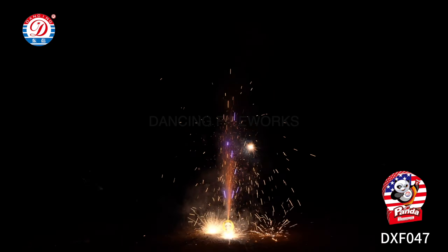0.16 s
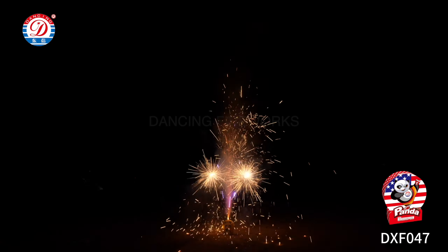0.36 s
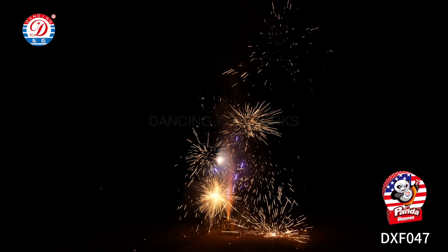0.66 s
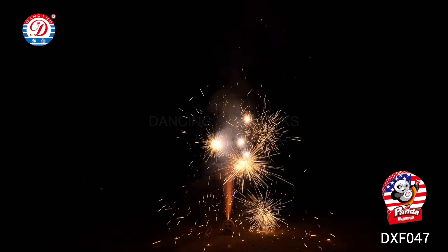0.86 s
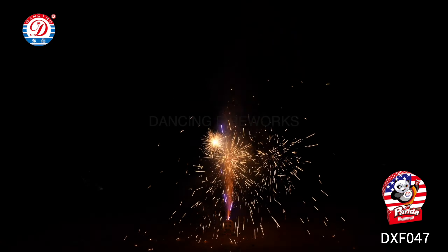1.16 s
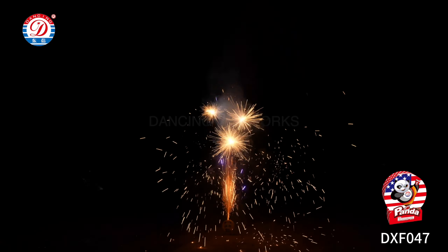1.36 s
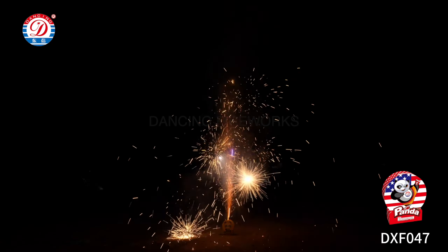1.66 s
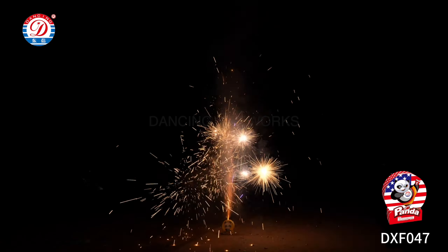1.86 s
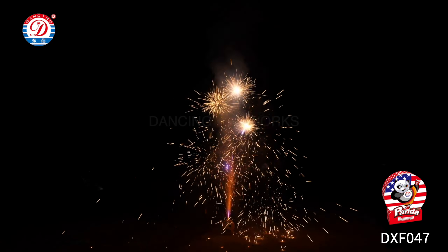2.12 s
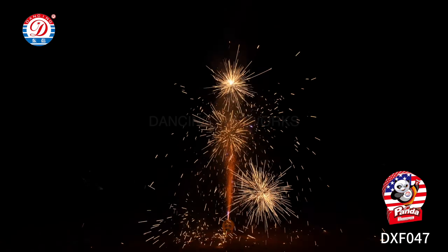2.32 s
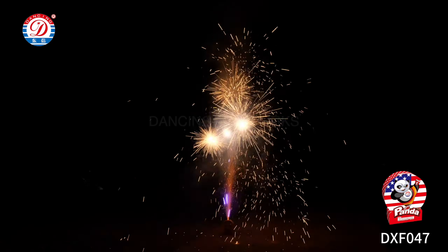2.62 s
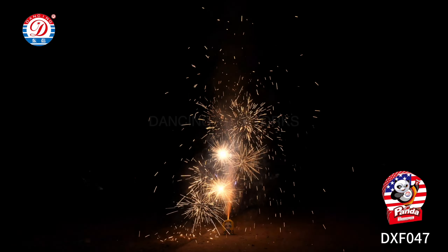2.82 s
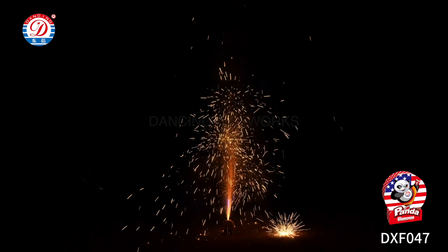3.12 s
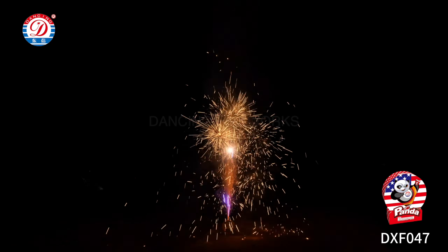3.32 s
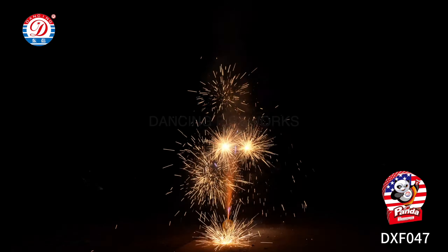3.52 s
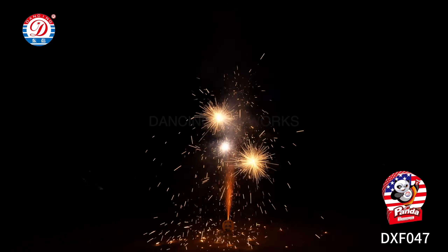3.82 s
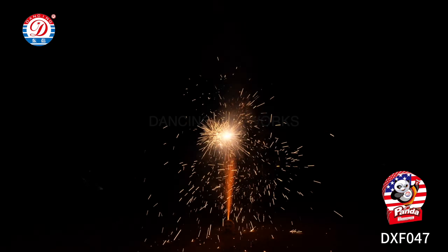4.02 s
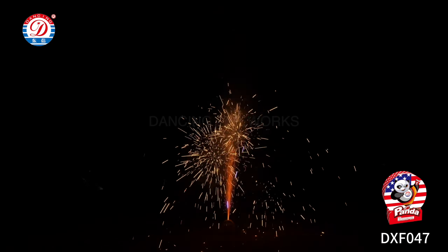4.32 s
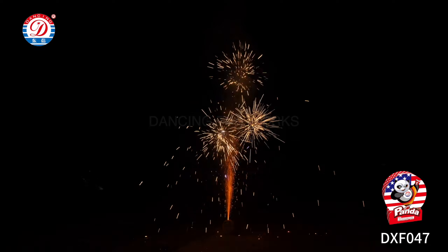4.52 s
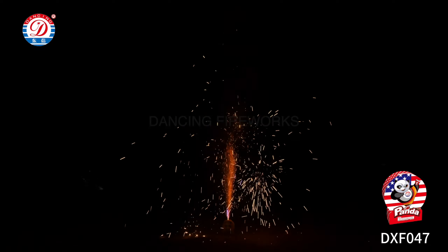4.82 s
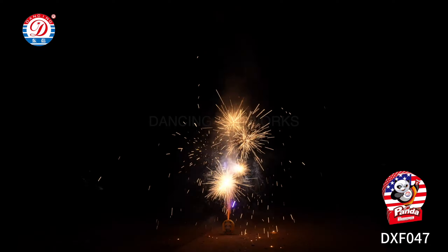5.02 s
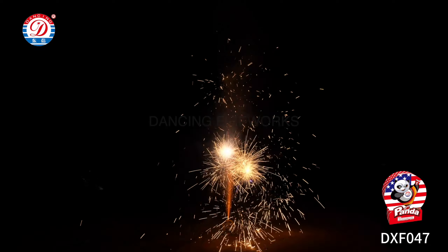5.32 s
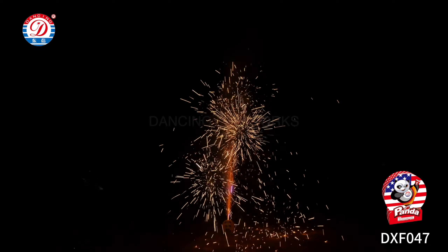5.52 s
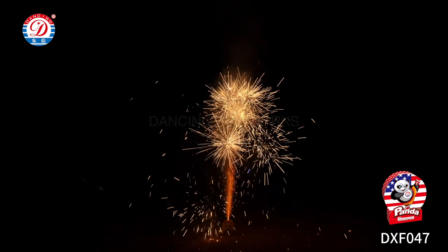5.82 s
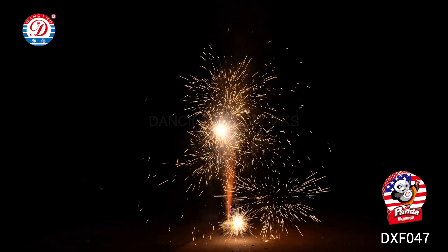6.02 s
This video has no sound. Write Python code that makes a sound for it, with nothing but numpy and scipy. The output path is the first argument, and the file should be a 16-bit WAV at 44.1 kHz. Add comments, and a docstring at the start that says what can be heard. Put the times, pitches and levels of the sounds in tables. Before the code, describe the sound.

Rapid dry crackling pops and short fizzes burst over a steady jet hiss, with a few much louder cracks, close in open air.

```python
"""Outdoors at night, a ground firework fountain burns: its nozzle hisses close above the pavement.
The stars it throws burst about thirty times a second, each a noise snap and a short gritty fizz.
About half of them shed a crumb that bursts faintly just after; all leave a brief sizzle of fine sparks.
Scatter trails the crackle. A limiter ducks everything after loud bursts; the hiss swells back in the lulls."""
import sys
import numpy as np
from scipy import signal
from scipy.fft import rfft, irfft, next_fast_len
from scipy.io import wavfile
from scipy.ndimage import uniform_filter1d, map_coordinates

SR = 44100
rng = np.random.default_rng(int(sys.argv[2]) if len(sys.argv) > 2 else 0)


def generate_wav(signal):
    """Clip the signal to [-1, 1] and save it as 16-bit WAV at the path in sys.argv[1]."""
    frames = np.transpose(np.atleast_2d(signal))
    scaled = np.clip(frames, -1, 1) * 32767
    pcm = np.round(scaled).astype(np.int16)
    wavfile.write(sys.argv[1], SR, pcm)


N = 272097
TOP_HZ = 15900  # upper band limit


def amp(db):
    """Decibels to gain."""
    return 10 ** (np.asarray(db) / 20)


def unit(x):
    """Scale to rms 1."""
    return x / np.sqrt(np.mean(x ** 2) + 1e-20)


def along(points, hz):
    """Interpolate (Hz, value) points on a log frequency axis."""
    point_hz, value = np.transpose(points)
    return np.interp(np.log(hz + 1), np.log(point_hz + 1), value)


def wobble(knots_per_s):
    """Smooth random curve: a spline through Gaussian knots."""
    knots = rng.standard_normal(int(N * knots_per_s / SR) + 4)
    return map_coordinates(knots, [np.arange(N) * knots_per_s / SR])


def filtered(x, response):
    """Filter x with a complex response of frequency."""
    size = next_fast_len(N + SR // 2)
    hz = np.fft.rfftfreq(size, 1 / SR)
    return irfft(rfft(x, size) * response(hz), size)[..., :N]


def causal(gain):
    """Minimum-phase response with this gain along the last axis, by folding the cepstrum."""
    cepstrum = irfft(np.log(gain))
    index = np.arange(cepstrum.shape[-1])
    fold = (1 + np.sign(index)) * (index < len(index) / 2)
    return np.exp(rfft(cepstrum * fold))


def echo(hz, delay_ms, strength):
    """Response of a sound plus one reflection, scaled to unchanged mean power."""
    reflection = strength * np.exp(-2j * np.pi * hz * delay_ms / 1000)
    return (1 + reflection) / np.sqrt(1 + strength ** 2)


# Spectrum of the gas jet. Each row: frequency in Hz, relative density in dB per Hz.
JET_SPECTRUM = [(20, -27), (130, -8), (300, -7.5), (560, -7), (1200, -1.5), (2100, -6), (3450, 1),
                (4500, -5), (7200, -6), (9000, -8.5), (16000, -42)]


def nozzle():
    """Turbulent gas jet: shaped noise, slightly hollow, combed by the ground just below, sputtering."""
    ground_ms = np.array([[.28], [.305]])  # left, right microphone

    def response(hz):
        hollow = echo(hz, delay_ms=2.83, strength=-along([(1500, .28), (3000, .06)], hz))
        comb = echo(hz, ground_ms, strength=.55)
        return amp(along(JET_SPECTRUM, hz)) * comb * hollow * (hz < TOP_HZ)

    hiss = unit(filtered(rng.standard_normal(N), response))
    sputter_db = 1.0 * wobble(25) + 2 * wobble(220)
    return amp(sputter_db) * hiss


# Spectrum of the hiss arriving from all around. Each row: frequency in Hz, relative density in dB per Hz.
SURROUND_SPECTRUM = [(15, -28), (45, -9), (200, -17), (1100, -4), (2800, -14), (4100, 12), (6000, 2),
                     (8200, 13), (9400, -16), (16000, -23)]


def surround():
    """Jet hiss scattered by smoke and ground: noise independent at the two microphones."""
    noise = rng.standard_normal((2, N))
    return unit(filtered(noise, lambda hz: amp(along(SURROUND_SPECTRUM, hz))))


# Level of the jet hiss over time, stronger in some lulls. Each row: time in seconds, relative level in dB.
HISS_LEVEL = [(0.0, -30), (0.17, -24), (0.6, -26.5), (1.4, -29.5), (3.05, -29), (4.15, -31.5), (4.4, -28),
              (4.85, -28), (5.2, -28), (5.93, -24), (6.17, -29.5)]


def jet():
    """One level curve drives the direct hiss and its scattered part alike."""
    level_db = np.interp(np.arange(N) / SR, *np.transpose(HISS_LEVEL))
    return amp(level_db) * (amp(-3.6) * nozzle() + amp(-14.5) * surround())


CRUMB_COUNT = 90  # stars that shed one
CRUMB_DELAY_S, CRUMB_REL_DB, CRUMB_BURN_MS = 0.011, -25.5, 12.3  # typical crumb
CRUMB_SPREAD_LOG, CRUMB_SPREAD_DB = 0.33, 1  # scatter of delay and burn time; of level
# Bursting stars, loud and faint. Each row: start in seconds, relative level in dB, burn time in ms.
LISTED_STARS = [ (0.014, -17, 14), (0.038, -23, 3.2), (0.0562, -17.5, 6.4), (0.0816, -20, 5.7),
                (0.1344, -19, 6.7), (0.2084, -7, 23), (0.2285, -10.5, 12), (0.2694, -16.5, 2.4),
                (0.288, -19, 9.8), (0.312, -16, 10.6), (0.33, -17, 2.2), (0.3827, -15.5, 1.4),
                (0.389, -20, 11), (0.4328, -13, 3.3), (0.4736, -3, 6.5), (0.488, -10, 16.5),
                (0.518, -20, 6.4), (0.5296, -11, 2), (0.5723, 4, 15), (0.635, -9.5, 9.1), (0.648, -16, 10),
                (0.682, -12, 9), (0.712, -12, 5), (0.734, -12.5, 5.2), (0.75, -19, 23), (0.8156, -9.5, 3),
                (0.826, -18, 9.6), (0.8445, -18, 4.4), (0.8755, -16, 6.8), (0.889, -21, 26),
                (0.956, -20.5, 14), (1.0254, -17.5, 6.5), (1.12, -24, 6.3), (1.184, -18.5, 7),
                (1.218, -7, 5.3), (1.2447, -12, 2), (1.269, -6, 9.3), (1.288, -20, 4.9), (1.327, -32, 6),
                (1.399, -12.5, 7), (1.4123, -18, 12.3), (1.468, -17.5, 4), (1.483, -19, 6.4),
                (1.506, -14.5, 6.5), (1.5642, -17, 7.7), (1.5864, -22.5, 2.7), (1.621, -17.5, 3.6),
                (1.6434, -22.5, 3.8), (1.657, -22.5, 2.6), (1.686, -12, 5), (1.716, -18, 6.1),
                (1.782, -8, 7.5), (1.8044, -4, 5), (1.821, -11, 4.1), (1.833, -12.5, 7.2),
                (1.849, -21.5, 18), (1.890, -15, 6), (1.91, -25, 4), (1.923, -14, 5.6), (1.950, -9, 2.5),
                (1.972, -20.5, 9.2), (1.9888, -7.5, 3.3), (2.0265, -20, 8.3), (2.0614, -23, 7.5),
                (2.083, -19, 8.3), (2.133, -8, 8.4), (2.167, -13, 6), (2.181, -15.5, 2.7), (2.21, -25, 6.9),
                (2.234, -24, 5.7), (2.267, -11, 3.1), (2.336, -12, 4.8), (2.3456, -14.5, 4.4),
                (2.408, -21, 3.8), (2.423, -20, 3.3), (2.433, -11, 3.9), (2.451, -18.5, 4.2),
                (2.469, -18, 3.9), (2.48, -16, 4.1), (2.495, -14, 6.6), (2.522, -19, 7), (2.551, -11, 9.8),
                (2.574, -26, 6.3), (2.658, -10.5, 6.5), (2.683, -18.5, 13), (2.692, -20, 5.1),
                (2.707, -9.5, 4.3), (2.748, -24.5, 29), (2.799, -11.5, 1.2), (2.829, -14, 9.7),
                (2.872, -13.5, 4.8), (2.890, -12, 10.4), (2.9204, -15, 12), (2.9548, -10, 5.4),
                (2.967, -10.5, 2.2), (3.017, -20.5, 7.1), (3.047, -21, 5.1), (3.058, -22.5, 17),
                (3.103, -7.5, 5.2), (3.1165, -13, 3.7), (3.139, -29.5, 64), (3.223, -19, 7.4),
                (3.2484, -20.5, 8.5), (3.268, -22.5, 8.4), (3.309, -14, 9.3), (3.332, -8, 4.8),
                (3.345, -7, 3.8), (3.380, -7, 0.47), (3.4102, -12, 7), (3.4716, -9, 5.7),
                (3.502, -14.5, 5.5), (3.516, -17, 14.5), (3.539, -20, 8.9), (3.602, -8.5, 1.7),
                (3.6366, -14, 4.2), (3.674, -28, 14), (3.711, -9, 8.8), (3.739, -8, 10.7),
                (3.763, -12, 4.5), (3.7923, -10.5, 8), (3.880, -12, 6), (3.906, -20, 3.4),
                (3.9402, -14, 10.6), (3.957, -13, 5.8), (3.9682, -14, 7), (3.976, -6.5, 8),
                (4.0353, -12, 10.6), (4.0639, -12, 11.4), (4.086, -9, 3.6), (4.137, -10, 4.6),
                (4.1643, -16.5, 5.3), (4.226, -15.5, 6.8), (4.294, -9, 4.6), (4.320, -7.5, 2.7),
                (4.499, -13, 13.4), (4.523, -7, 6), (4.54, -12, 4.1), (4.599, -6.5, 11), (4.616, -17, 22),
                (4.694, -10.5, 2), (4.711, -22.5, 18), (4.7474, -22, 9), (4.765, -14, 8), (4.781, -13, 4.3),
                (4.803, -24, 7.4), (4.978, -8.5, 4.6), (5.043, -15, 6.4), (5.06, -23, 40), (5.082, -13, 7),
                (5.104, -10.5, 1.9), (5.18, -7.5, 9), (5.196, -14, 4), (5.229, -13, 6.9), (5.242, -10, 2.4),
                (5.254, -12.5, 5.3), (5.280, -18, 14), (5.31, -17, 16), (5.3426, -16, 1.7),
                (5.359, -12, 4.7), (5.371, -13, 1.9), (5.422, -14, 7.4), (5.445, -23.5, 12),
                (5.466, -12, 7), (5.488, -2.5, 17), (5.529, -10.5, 5.4), (5.623, -7, 6.7), (5.641, -16, 4),
                (5.675, -12.5, 7.4), (5.751, -22, 6.3), (5.774, -12, 11), (5.806, -17.5, 4.3),
                (5.835, -7, 7.1), (5.853, -17, 13), (5.8694, -12.5, 3.9), (5.9787, 4, 9.9), (6.002, -6, 16),
                (6.03, -17.5, 13.5), (6.088, -8, 10.3), (6.111, -19.5, 18), (6.144, -15, 6.4),
                (6.1655, -10, 2.4)]


def crackle_rows():
    """Listed stars plus the crumbs that randomly chosen ones shed, in the same columns."""
    listed = np.array(LISTED_STARS)
    late, loud, slow, luck = rng.standard_normal((len(listed), 4)).T
    crumb_s = listed[:, 0] + CRUMB_DELAY_S * np.exp(CRUMB_SPREAD_LOG * late)
    crumb_db = CRUMB_REL_DB + CRUMB_SPREAD_DB * loud
    crumb_ms = CRUMB_BURN_MS * np.exp(CRUMB_SPREAD_LOG * slow)
    crumbs = np.column_stack([crumb_s, crumb_db, crumb_ms])
    shed = np.argsort(luck)[:CRUMB_COUNT]
    return np.vstack([listed, crumbs[shed]])


def dullness(level_db, burn_ms):
    """Treble loss of each star in dB per octave: faint and slow burners sound duller."""
    faint = 0.19 * np.maximum(-16 - level_db, 0)  # per dB below -16
    slow = 0.14 * np.log2(np.maximum(burn_ms, .5) / 13.4)  # per doubling of burn time
    return faint + slow + 0.52 * rng.standard_normal(len(level_db))


def accent(hz, count, centre_hz, scatter_octaves, width_octaves, height_db):
    """Each star cracks at its own pitch, one hump in dB, over a low thump of its own weight."""
    pitch, height, weight = rng.standard_normal((count, 3)).T[:, :, None]
    offset_octaves = np.log2((hz + 1) / centre_hz) - scatter_octaves * pitch
    hump = np.tanh(np.abs(height)) / (1 + (offset_octaves / width_octaves) ** 2)
    thump_db = 2.5 * weight / (1 + (hz / 330) ** 4)  # ends near 330 Hz
    return height_db * hump + thump_db


def bursts(burn_ms, size, snap_ms, snap_gain, shock, grain, fade, swell):
    """Mid and side pressure of each star: a shock front, then gritty fizz while it burns out."""
    ms = np.arange(size) / SR * 1000
    noise = rng.standard_normal((len(burn_ms), 3, size))
    burn_ms = np.maximum(burn_ms[:, None, None], .5)
    snap = noise[:, :2] * np.exp(-ms / snap_ms)
    snap[:, 0, 0] += shock
    snap /= np.linalg.norm(snap, axis=-1, keepdims=True)
    sudden = 1 / (1 + (burn_ms / 16) ** 2)  # slow burners flare up with less snap
    rise = 1 - np.exp(-ms / (swell * burn_ms))
    flare = rise * np.exp(-(ms / burn_ms) ** fade)
    fizz = unit(noise[:, :2, ::-1] * np.exp(grain * noise[:, 2:]))
    return snap_gain * sudden * snap + flare * fizz


# Spectrum of a burst. Each row: frequency in Hz, relative density in dB per Hz.
BURST_SPECTRUM = [(20, -25), (60, -10.5), (125, -3), (210, -3), (320, -8.5), (550, -5.5), (800, -9),
                  (1500, -4), (2500, -1.5), (3500, -1.5), (4800, -4), (7200, 0), (8400, -3), (16000, -3)]
# Likeness of left and right in the bursts. Each row: frequency in Hz, coherence from -1 to 1.
BURST_COHERENCE = [(150, 1), (800, 0.95), (1600, 1), (3500, 0.96), (4800, 0.69), (7200, 0.72),
                   (8400, -0.056), (9500, 0.16), (16000, 0.29)]


def stars(rows, size=4096):
    """Each star bursts with its own colour, at its own height above the reflecting pavement."""
    start_s, level_db, burn_ms = np.transpose(rows)
    dull = dullness(level_db, burn_ms)
    hz = np.fft.rfftfreq(size, 1 / SR)
    accent_db = accent(hz, len(rows), centre_hz=2560, scatter_octaves=0.57, width_octaves=0.2,
                       height_db=11.5)
    accent_db = accent_db / (1 + (burn_ms[:, None] / 13) ** 2)  # slow burners lack a clear pitch
    tilt_db = -dull[:, None] * np.log2(np.maximum(hz, 550) / 4000)
    colour = amp(along(BURST_SPECTRUM, hz) + accent_db + tilt_db)
    colour /= np.sqrt(np.mean(colour ** 2 * (hz < TOP_HZ), axis=1, keepdims=True))

    bounce_ms = np.abs(1.7 + 0.565 * rng.standard_normal((len(rows), 1)))  # higher stars echo later
    path = amp(level_db)[:, None] * causal(colour) * echo(hz, bounce_ms, strength=0.4)
    # splitting mid and side by this angle sets the left-right coherence
    angle = np.arccos(np.clip(along(BURST_COHERENCE, hz), -.99, .99)) / 2
    mid_side = causal(np.array([np.cos(angle), np.sin(angle)]))
    raw = bursts(burn_ms, size, snap_ms=0.15, snap_gain=7.7, shock=1.52, grain=0.53, fade=1.8, swell=0.029)
    waves = irfft(rfft(raw) * path[:, None] * mid_side)

    first = np.round(np.abs(start_s) * SR).astype(int)
    index = (first[:, None] + np.arange(size)).ravel()
    mid, side = [np.bincount(index, w.ravel(), N)[:N] for w in waves.swapaxes(0, 1)]
    return np.array([mid + side, mid - side])


# Spectrum of the fine sparks. Each row: frequency in Hz, relative density in dB per Hz.
SPARK_SPECTRUM = [(100, -52), (700, -5), (2000, 7), (3400, 4), (5500, 8), (7600, 5.5), (9500, 6.5),
                  (16000, 4)]


def sparks(burst_s, life_s=0.02):
    """Every burst feeds a decaying crowd of tiny sparks; the noise power follows it, so lulls turn dull."""
    births = np.bincount(np.abs(burst_s * SR).astype(int), minlength=N)[:N]
    step = 1 - np.exp(-1 / (life_s * SR))
    crowd = signal.lfilter([step], [1, step - 1], births / births.mean())
    ticks = rng.standard_normal((2, N)) * np.exp(.5 * rng.standard_normal(N))
    spray = unit(filtered(ticks, lambda hz: amp(along(SPARK_SPECTRUM, hz)) * (hz < TOP_HZ)))
    return amp(0.32 * wobble(70)) * np.sqrt(0.033 + crowd) * spray


# Decay of scatter from the surroundings. Each row: frequency in Hz, time to fall 60 dB in seconds.
YARD_DECAY = [(120, 0.24), (1000, 0.095), (12000, 0.38)]


def yard(x):
    """Outdoor scatter as decaying noise, shortest near 1 kHz, longest in the treble; bass most alike."""
    hz, t, z = signal.stft(rng.standard_normal((2, SR // 2)), SR, nperseg=256)
    z[1] *= np.minimum((hz + 400) / 1800, 1)[:, None]  # narrow the bass
    decay = amp(-60 * t / along(YARD_DECAY, hz)[:, None])
    mid, side = signal.istft(z * decay, SR, nperseg=256)[1]
    tail = np.array([mid + side, mid - side])
    return signal.fftconvolve(x, tail / np.linalg.norm(tail[0]), axes=1)[:, :N]


def scene():
    """Hiss, crackle, fine sparks and faint scatter in the open air."""
    hiss = jet()
    rows = crackle_rows()
    crackle = stars(rows)
    sizzle = amp(-26.5) * sparks(rows[:, 0])
    return hiss + amp(6.0) * crackle + sizzle + amp(-12.5) * yard(crackle)


def limiter(x, threshold_db, release_s, attack_ms, size=44):
    """Gain drops as power passes the threshold, then creeps back; its lag lets some of the snap through."""
    power = np.abs(uniform_filter1d(np.mean(x ** 2, axis=0), size)) + 1e-12
    over_db = np.maximum(10 * np.log10(power) - threshold_db, 1e-6)
    age = np.arange(N) / SR / release_s
    held_db = np.exp(np.maximum.accumulate(np.log(over_db) + age) - age)  # peak hold, exponential release
    step = 1 - np.exp(-1000 / (attack_ms * SR))
    cut_db = signal.lfilter([step], [1, step - 1], held_db)
    return x * amp(-cut_db)


# Stereo imbalance of the microphones. Each row: frequency in Hz, left minus right in dB.
MIC_BALANCE = [(200, 0.1), (380, 0.5), (700, 0), (1290, -1), (2380, 0), (4400, -1.5), (8120, 0),
               (15000, -4.5)]


def record(dry):
    """Left microphone duller at the top; limiter, soft clip towards 0.72, then the band limit."""
    halves = np.array([[.5], [-.5]])
    heard = filtered(dry, lambda hz: amp(along(MIC_BALANCE, hz) * halves))
    held = limiter(heard, threshold_db=-16.0, release_s=0.038, attack_ms=0.79)
    rounded = held / (1 + np.abs(held / .72) ** 4) ** (1 / 4)
    return filtered(rounded, lambda hz: hz < TOP_HZ)


dry = scene()
out = record(dry)
generate_wav(out)
```